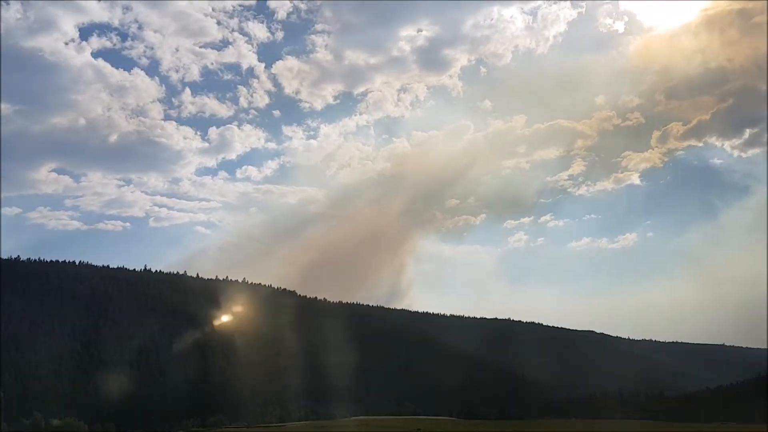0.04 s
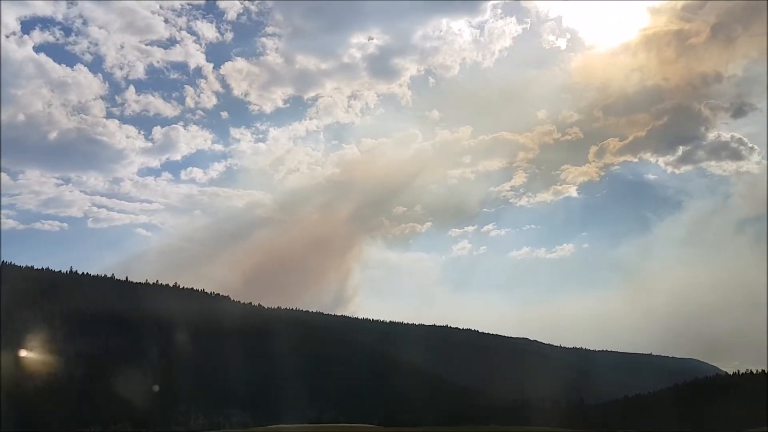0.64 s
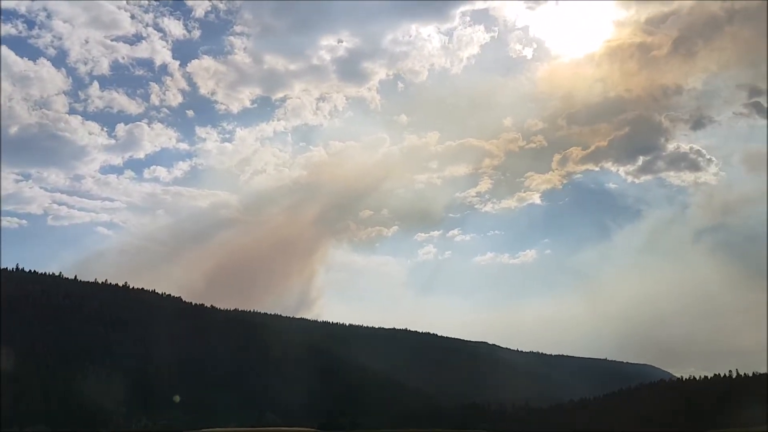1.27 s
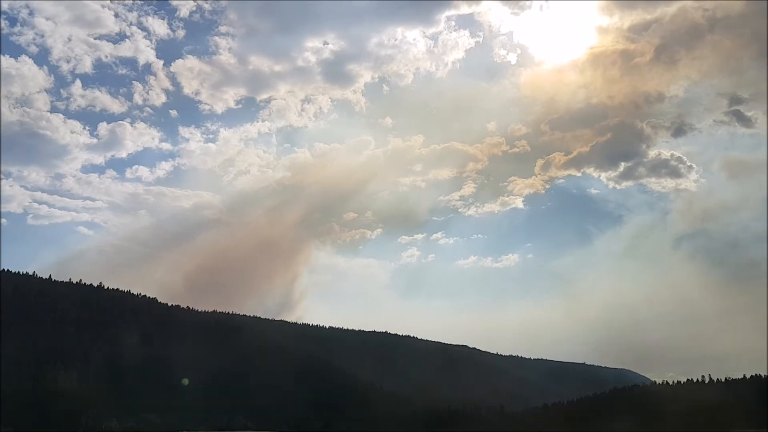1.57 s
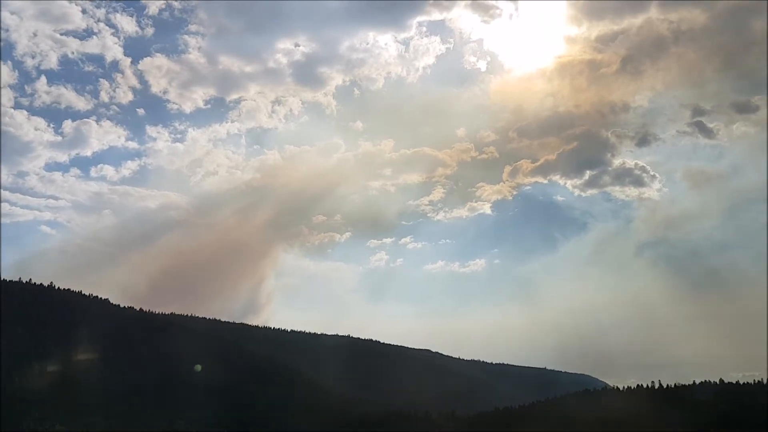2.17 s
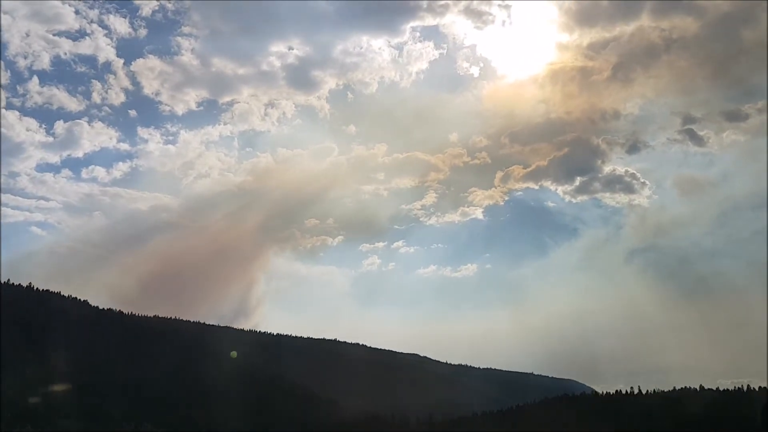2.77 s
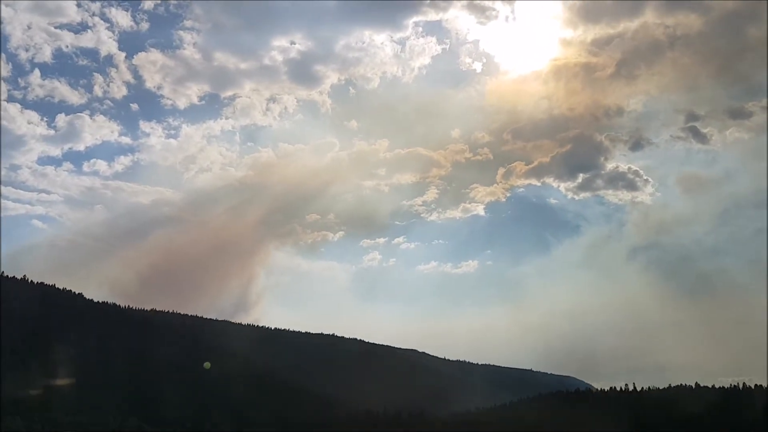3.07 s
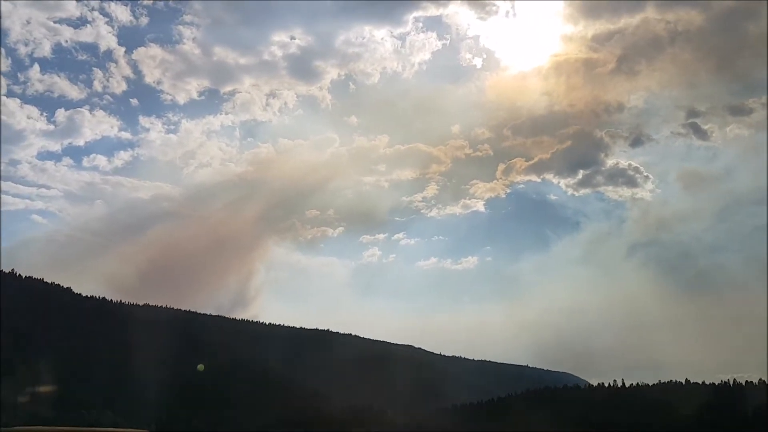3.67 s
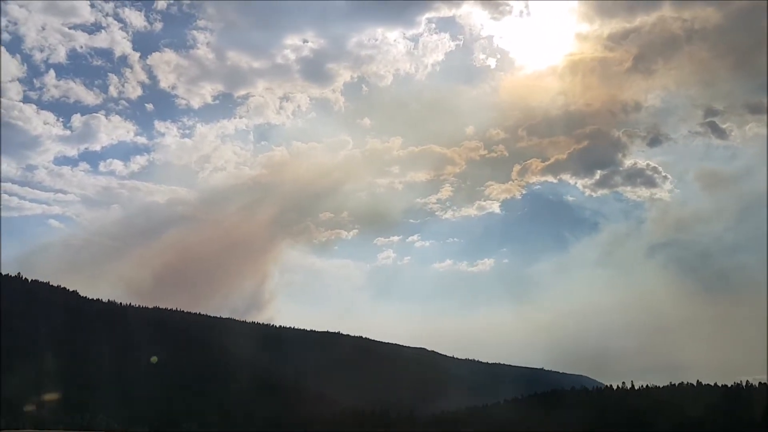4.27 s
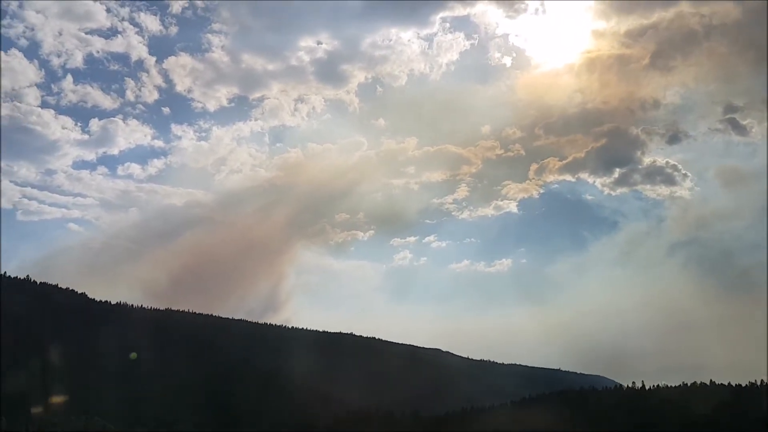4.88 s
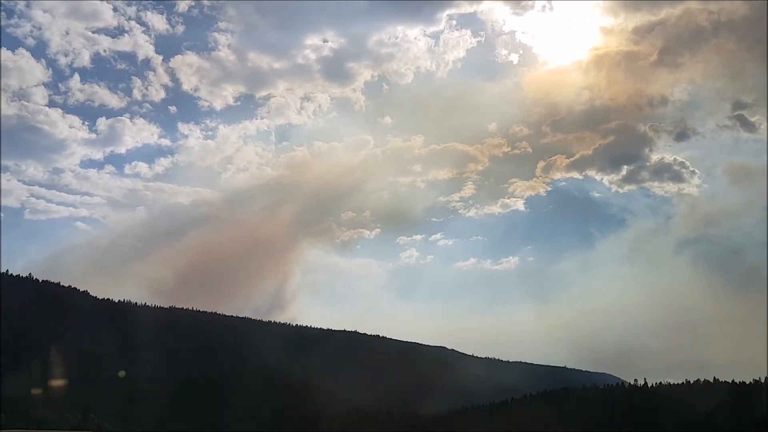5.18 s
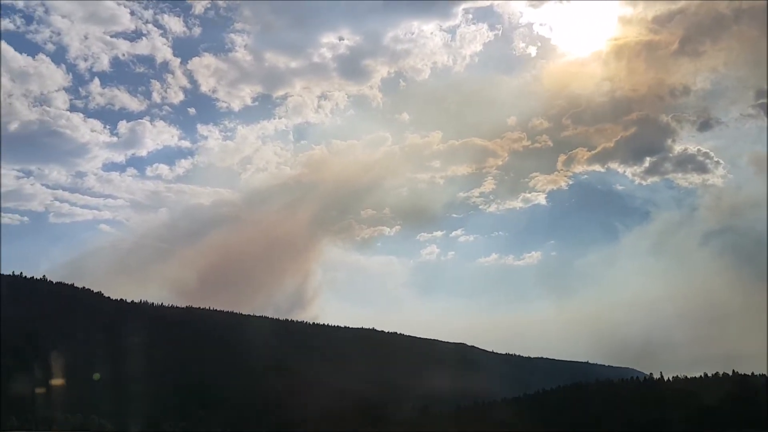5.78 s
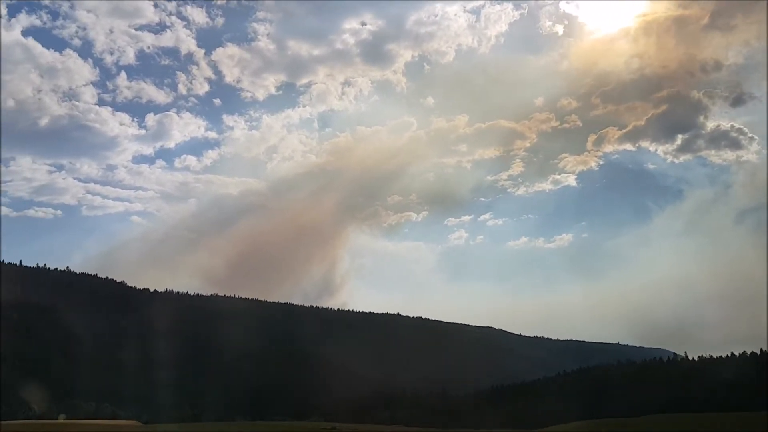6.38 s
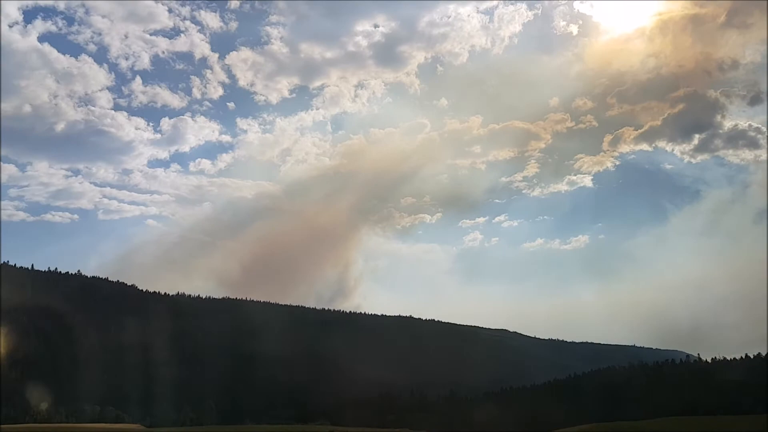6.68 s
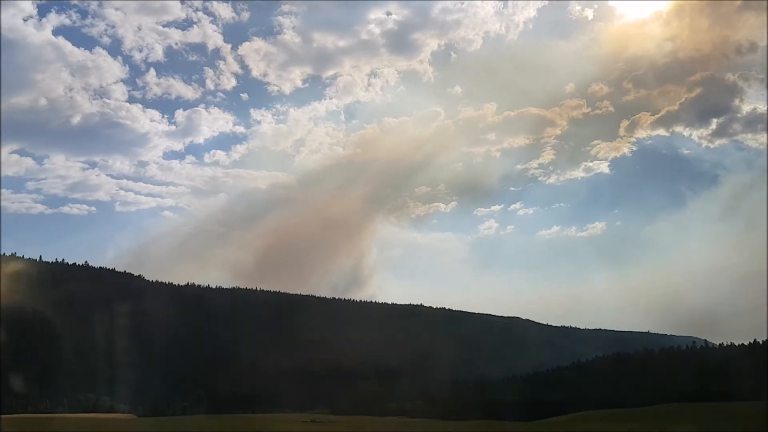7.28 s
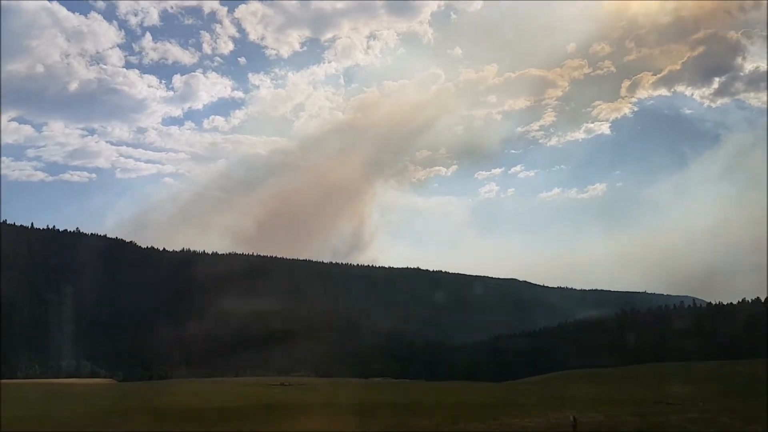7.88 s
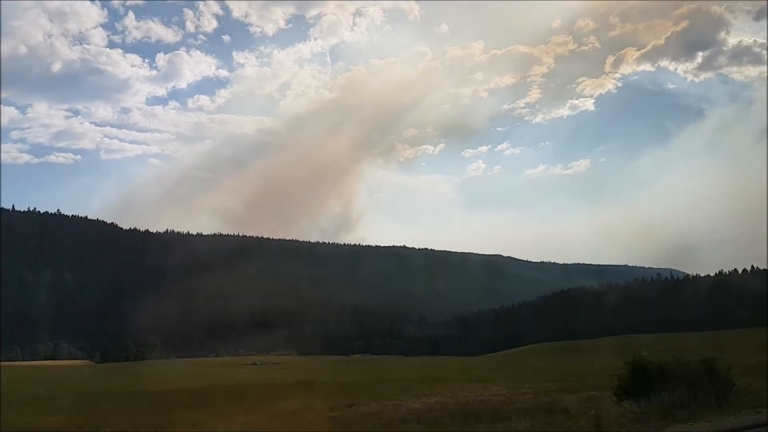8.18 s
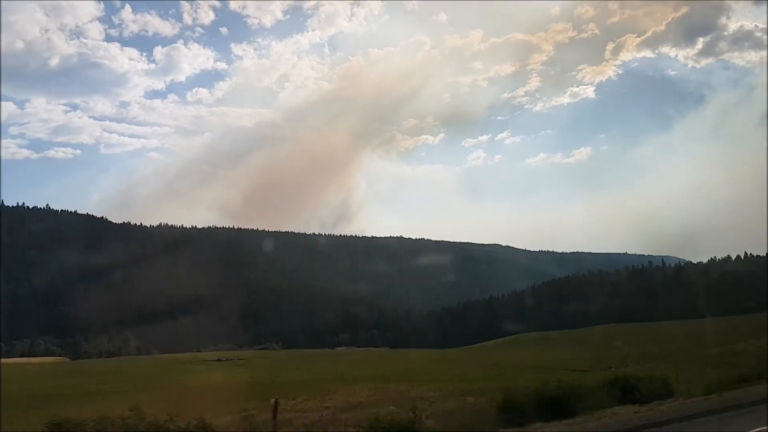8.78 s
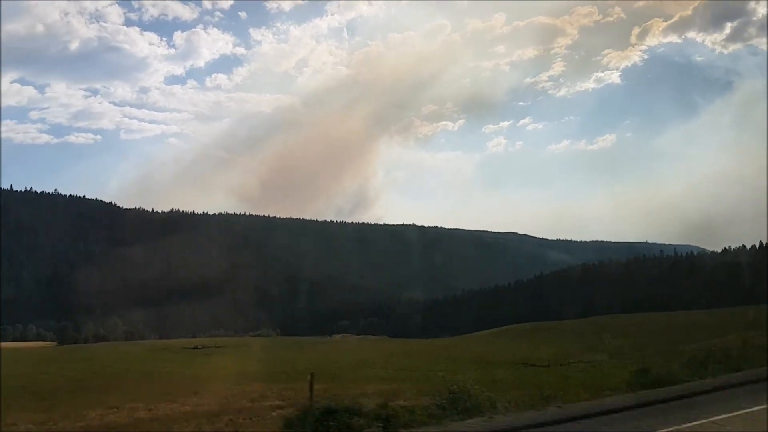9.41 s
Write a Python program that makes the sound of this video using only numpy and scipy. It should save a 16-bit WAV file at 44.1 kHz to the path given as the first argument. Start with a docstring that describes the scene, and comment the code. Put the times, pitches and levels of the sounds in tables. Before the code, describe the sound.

A low, gently beating drone of engine and wheels fills the cabin of a cruising car, along with road rumble and wind hiss outside the glass. Faint finger scuffs touch the handheld microphone at the start, followed by a single sharp click. In the second half, close scratchy rubbing builds into a few small snaps of the phone case, while the driving noise carries on evenly.

```python
"""Highway cruise from inside the car

A phone is held near the side window. Wheels, drive shaft and engine drone in beating tones over
the rumble of the road and the rush of air. The hand cups the right microphone, so it hisses
brighter; fingers scuff the case at point-blank range, and once the sound jumps with a sharp click."""
import sys
import numpy as np
from scipy import signal
from scipy.fft import rfft, irfft
from scipy.io import wavfile

SR = 44100
rng = np.random.default_rng(int(sys.argv[2]) if len(sys.argv) > 2 else 0)


def master_out(mix):
    """Clip the mix to full scale and print it as 16-bit PCM to the path in sys.argv[1]."""
    frames = np.transpose(np.atleast_2d(mix))
    ceiling = np.clip(frames, -1, 1)
    pcm = np.round(ceiling * 32767).astype(np.int16)
    wavfile.write(sys.argv[1], SR, pcm)


N = 425565
TIME = np.arange(N) / SR
FREQS = np.maximum(np.arange(N // 2 + 1) * SR / N, 1)
SIDES = np.array([[1], [-1]])  # left, right microphone


# Turning parts, heard from the seat: (order [cycles per turn], level [dB], waver [0-1])
SHAFT_ORDERS = [(1, -27.5, 0), (2, -15.5, .1)]
WHEEL_ORDERS = [(6, -23, 0.14), (7, -35.5, 0.18), (9, -24, 0.15), (12, -22, 0.21), (14, -41, 0.82),
                (15, -36, 0.27)]
ENGINE_ORDERS = [(2, -22.5, 0.2), (3.5, -32.5, .3), (4, -32.5, 0.8), (10, -34, 0.1)]
# Gears and belts: (pitch at mean speed [Hz], level [dB], waver [0-1], left minus right [dB])
WHINES = [(254.3, -36.5, 0.8, 0), (443.5, -41.5, 0.9, 14.5), (589.6, -45.5, 0.7, -3.5), (1245, -56, 1, 2.5)]
SHAFT_HZ, SHAFT_RISE_HZ_PER_S = 63.575, .0625  # the car gathers speed very gently
WHEEL_PER_SHAFT, ENGINE_PER_SHAFT = .2034, .6365

def drivetrain():
    """Shaft, wheels and engine are geared together; their close orders beat in the cabin."""
    shaft_hz = SHAFT_HZ + SHAFT_RISE_HZ_PER_S * TIME
    turns = np.cumsum(shaft_hz) / SR
    parts = (1, SHAFT_ORDERS), (WHEEL_PER_SHAFT, WHEEL_ORDERS), (ENGINE_PER_SHAFT, ENGINE_ORDERS)
    drone = np.zeros((2, N))
    for ratio, orders in parts:
        for order, db, waver in orders:
            drone += rotating_tone(turns * ratio * order, db, waver, waver_hz=4.1)
    pace = np.cumsum(shaft_hz / shaft_hz.mean()) / SR
    for hz, db, waver, pan_db in WHINES:
        drone += rotating_tone(hz * pace, db, waver, waver_hz=6.2) * pan(pan_db)
    return drone


def rotating_tone(cycles, db, waver, waver_hz):
    """A rotating force whose strength and phase wander with the load."""
    wander = 1 + waver * (walk(waver_hz) + 1j * walk(waver_hz)) / np.sqrt(2)
    wave = wander * np.exp(2j * np.pi * (cycles + rng.random()))
    return undb(db) * np.real(wave) * np.sqrt(2 / (1 + waver ** 2))


# Tyre rumble, coming through floor and doors: (frequency [Hz], density [dB per Hz])
RUMBLE = [(12, -56), (23, -48), (33, -43.5), (42, -39), (51, -41.5), (68, -37.5), (100, -37.5), (140, -45),
          (200, -46), (290, -46), (350, -53), (430, -52.5), (600, -66.5)]
# Tread roar on the asphalt below: (frequency [Hz], density before the tread gain [dB per Hz])
TREAD = [(250, -75), (420, -61), (560, -57.5), (700, -57.5), (880, -58), (1020, -60.5), (1120, -71.5),
         (1230, -68), (1450, -80.5)]
TREAD_GAIN_DB, TREAD_EASE_DB_PER_S = .46, .24
SMOOTH_ROAD_S, SMOOTH_FADE_S, SMOOTH_DROP_DB = 7.74, .3, 1.5

def road():
    """Rough asphalt shakes the body; the tread roars in patches, eases, then drops on smoother road."""
    rumble = cabin_noise(RUMBLE) * undb(.3 * walk(8))
    tread_db = TREAD_GAIN_DB - TREAD_EASE_DB_PER_S * TIME
    tread_db -= SMOOTH_DROP_DB * ramp(SMOOTH_ROAD_S, SMOOTH_FADE_S)
    tread = cabin_noise(TREAD) * undb(tread_db + .96 * walk(17))
    return rumble + tread


# Air just outside the window: (frequency [Hz], density before the gain [dB per Hz])
WIND = [(300, -70.5), (600, -61.5), (850, -69), (1200, -64), (1500, -68.5), (2200, -71.5), (3000, -78),
        (4000, -83.5), (6000, -91), (7500, -98), (8600, -95.5), (9500, -99), (11000, -99.5), (13000, -103),
        (16000, -105)]

def air(gain_db):
    """Air rushes round the body; turbulence along the glass makes it flutter."""
    return cabin_noise(WIND) * undb(gain_db + .5 * walk(29) + .5 * walk(47))


# Scratch of skin and ring of the case, right at the microphones: (frequency [Hz], relative level [dB])
SCRATCH = [(1500, -19.5), (3500, -4.5), (7000, -7), (9000, -5.5), (11000, -3), (14000, -3.5), (16000, -6.5)]
CASE_RING = [(1500, -12), (3000, -4), (3800, -6), (4400, -4), (4780, 6.5), (5150, -3), (5900, -8),
             (6500, -5), (8200, -4), (9500, -12), (13000, -25)]

def fingers():
    """Each scuff is a swell of tiny slips: a bright scratch and the short ring of the case."""
    scratch_force, ring_force = np.zeros((2, 2, N))
    for contacts, pan_db in ((brushes(), -.5), (slides(), 1), (snaps(), .5)):
        for force, ring_db in contacts:
            scratch_force += pan(pan_db) * force
            ring_force += pan(pan_db) * force * undb(ring_db)
    slips = undb(3.5 * walk(500))
    slips /= np.sqrt(np.mean(slips ** 2))
    scuffs = np.zeros((2, N))
    for force, spectrum in ((scratch_force, SCRATCH), (ring_force, CASE_RING)):
        colour = contour(spectrum)
        colour /= np.sqrt(np.mean(colour ** 2))
        friction = force * slips * rng.standard_normal((2, N))
        scuffs += irfft(rfft(friction) * colour, N)
    return scuffs


# Light touches on the phone: (peak time [s], level [dB], ring over scratch [dB])
BRUSHES = [(.18, -50.5, 5), (.282, -50, 7), (.44, -51.5, 2), (.555, -57, -4), (2.604, -51, -9),
           (2.645, -50, -12), (2.712, -51, -9), (2.9, -45, -20), (6.331, -50, -8), (6.636, -44.5, -2.5),
           (6.751, -45, -7), (6.833, -48, -10), (7.705, -51, -2)]

def brushes():
    """Fingertips graze the case; yields each force and its ring."""
    for peak_s, db, ring_db in BRUSHES:
        yield undb(db) * touch(peak_s, rise_s=.0045, decay_s=.014), ring_db


# Rubs along the case: (start [s], end [s], final level [dB], ring over scratch [dB])
SLIDES = [(.15, .55, -60, 6), (6.9, 7.612, -48, 2.5), (7.93, 8.23, -50, -4), (9.61, 9.64, -48.5, -14)]

def slides(swell_s=.095, release_s=.06, jerk_db=3, jerk_hz=22):
    """A sliding finger presses ever harder, in small jerks, until it lets go."""
    for start, end, db, ring_db in SLIDES:
        pressure = (TIME > start) / (1 + np.maximum(end - TIME, 0) / swell_s)
        release = np.exp(-np.maximum(TIME - end, 0) / release_s)
        yield pressure * release * undb(db + jerk_db * walk(jerk_hz)), ring_db


# Close snaps: (peak time [s], level [dB], ring over scratch [dB], rise [s], decay [s])
SNAPS = [(7.63, -32, 9, .004, .0038), (7.969, -26, 7, .0007, .0032), (8.031, -41, 12, .003, .018),
         (8.266, -45.5, 7.5, .004, .009)]

def snaps():
    """The finger catches and the case snaps."""
    for peak_s, db, ring_db, rise_s, decay_s in SNAPS:
        yield undb(db) * touch(peak_s, rise_s, decay_s), ring_db


def touch(peak_s, rise_s, decay_s):
    """A force that swells to its peak and dies away."""
    age = TIME - peak_s
    fall = np.maximum(-age / rise_s, age / decay_s)
    return np.exp(-np.minimum(fall, 20))


def click(at_s, db, decay_s):
    """The sound jumps from one sample to the next, alike on both sides, and settles."""
    age = TIME - at_s
    return -undb(db) * (age >= 0) * np.exp(-abs(age) / decay_s)


# Hand over the right microphone, loosely and tightly cupped: (frequency [Hz], gain [dB])
HOLLOW_LOOSE = [(1400, 0), (2100, 3.5), (2700, 8), (3050, 10), (3350, 6.5), (4150, 11), (4400, 9.5),
                (4720, 12.9), (5050, 9.5), (6400, 13.8), (6750, 11), (7200, 0), (8600, -4), (11000, -1.5),
                (15000, -.5)]
HOLLOW_TIGHT = [(1200, -0.5), (1700, 6.5), (2400, 8), (3200, 5.5), (4000, 11.5), (5000, -2.5), (7000, 0),
                (15000, 0)]
# The grip closes in two squeezes: (middle [s], length [s], added tightness [0-1])
SQUEEZES = [(8.3, 1.8, .33), (9.41, .12, .57)]

def cupped_hand(sound):
    """The hollow of the hand rings at the right microphone, lower as the grip closes."""
    left, right = sound
    tightness = sum(amount * ramp(middle, length) for middle, length, amount in SQUEEZES)
    loose = irfft(rfft(right) * undb(across(HOLLOW_LOOSE)), N)
    tight = irfft(rfft(right) * undb(across(HOLLOW_TIGHT)), N)
    return np.array([left, loose + tightness * (tight - loose)])


def glass_echoes(sound, echo_db, decay_s, count=40):
    """Reflections from nearby windows and dashboard comb the sound, differently on each side."""
    lags_s = rng.uniform(.001, .016, (2, count))
    sizes = rng.standard_normal((2, count)) * np.exp(-lags_s / decay_s)
    sizes *= undb(echo_db) / np.linalg.norm(sizes, axis=1, keepdims=True)
    echoes = np.array([np.bincount((lag * SR).astype(int), size, N) for lag, size in zip(lags_s, sizes)])
    # only short waves are thrown back by such small panes
    reflected = FREQS ** 2 / (FREQS ** 2 + 900 ** 2)
    comb = (1 + reflected * rfft(echoes)) / np.sqrt(1 + (reflected * undb(echo_db)) ** 2)
    return irfft(rfft(sound) * comb, N)


# Likeness of the cabin noise at the two microphones: (frequency [Hz], correlation [-1 to 1])
LIKENESS = [(30, .995), (170, 0.89), (300, 0.94), (400, 0.57), (470, 0.28), (590, 0.84), (800, 0.13),
            (970, 0.41), (1200, -0.34), (2000, -0.15), (3500, 0.059), (8000, -.15), (15000, -.1)]

def cabin_noise(spectrum):
    """Stereo noise of the given density; long waves reach both microphones alike."""
    likeness = across(LIKENESS)
    mid, side = rfft(rng.standard_normal((2, N)))
    pair = mid * np.sqrt(1 + likeness) + SIDES * side * np.sqrt(1 - likeness)
    return irfft(pair * contour(spectrum) * np.sqrt(SR) / 2, N)


def undb(db):
    """Decibels to gain."""
    return 10 ** (np.asarray(db) / 20)


def pan(db):
    """A pair of gains, the left db above the right."""
    return undb(SIDES * db / 2)


def across(points):
    """Points joined on a log-frequency axis."""
    hz, value = np.transpose(points)
    return np.interp(np.log(FREQS), np.log(hz), value)


def contour(points):
    """Gain over frequency, falling 24 dB an octave outside the points."""
    beyond = FREQS / np.clip(FREQS, points[0][0], points[-1][0])
    return undb(across(points)) * np.minimum(beyond, 1 / beyond) ** 4


def walk(rate_hz):
    """A smooth random drift of spread 1 that changes about rate_hz times a second."""
    slow = irfft(rfft(rng.standard_normal(N)) * np.exp(-(FREQS / rate_hz) ** 2), N)
    return (slow - slow.mean()) / slow.std()


def ramp(middle_s, length_s):
    """An even change from 0 to 1."""
    return np.clip(.5 + (TIME - middle_s) / length_s, 0, 1)


def scene():
    """At the side window: drone, road and air fill the cabin; the fingers sound right at the phone."""
    rush = glass_echoes(road() + air(gain_db=.46), echo_db=-11.5, decay_s=.016)
    return cupped_hand(drivetrain() + rush + fingers())


def record(dry):
    """The phone: bass a little louder and later on the right, one click, rounded peaks, the top cut."""
    bass_db = 2.1 / (1 + (FREQS / 90) ** 4)
    lag_rad = .14 / (1 + (FREQS / 1500) ** 2)
    heard = irfft(rfft(dry) * pan(-bass_db) * np.exp(.5j * SIDES * lag_rad), N)
    heard += click(at_s=1.4233, db=-6.5, decay_s=.0008)
    rounded = heard / (1 + (heard / .97) ** 10) ** (1 / 10)
    lowpass = signal.ellip(10, .1, 70, 15800, fs=SR, output="sos")
    return signal.sosfilt(lowpass, rounded)


dry = scene()
out = record(dry)
master_out(out)
```